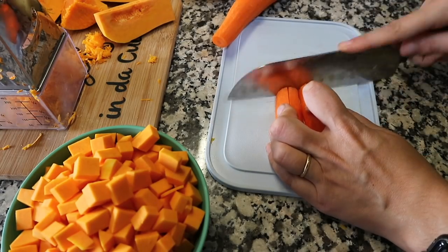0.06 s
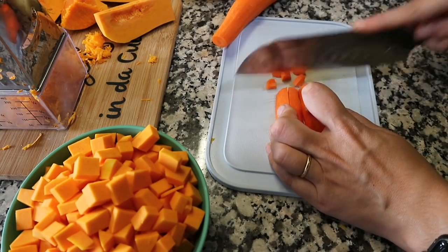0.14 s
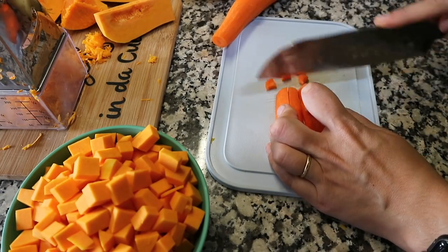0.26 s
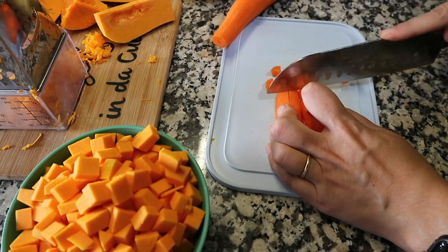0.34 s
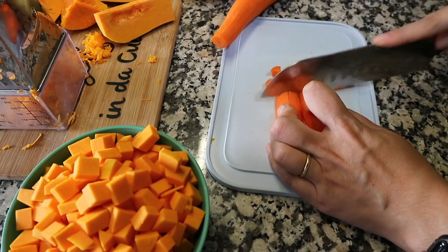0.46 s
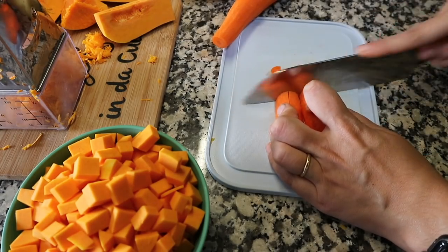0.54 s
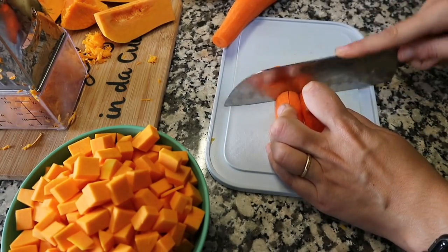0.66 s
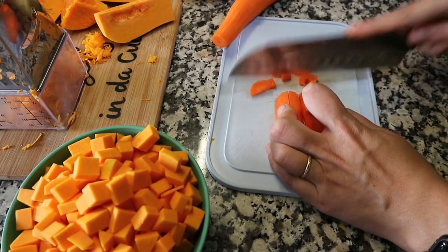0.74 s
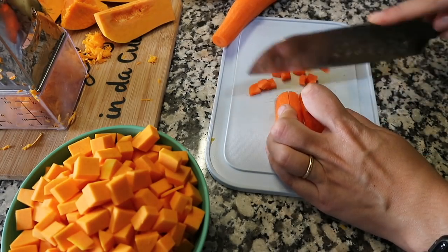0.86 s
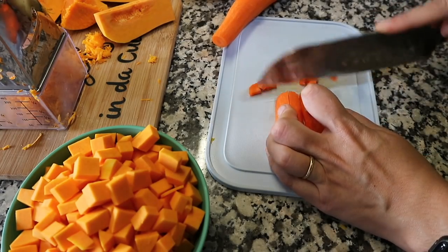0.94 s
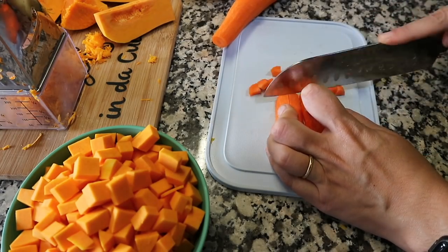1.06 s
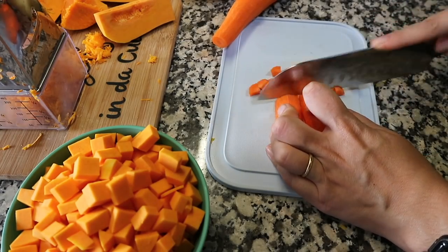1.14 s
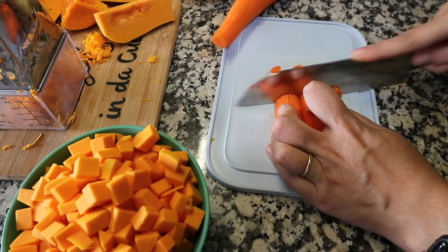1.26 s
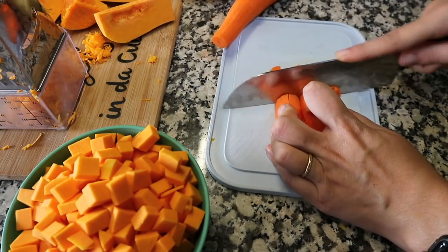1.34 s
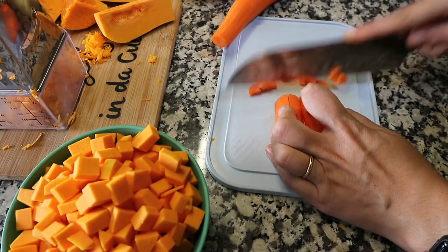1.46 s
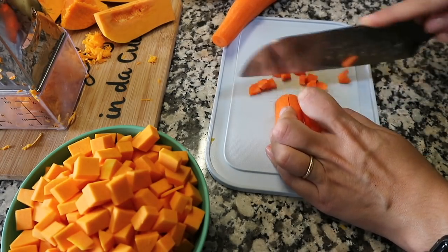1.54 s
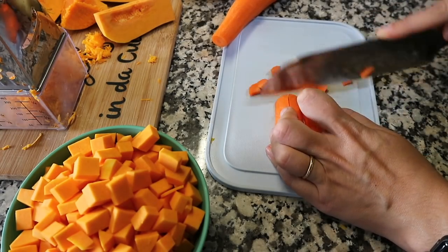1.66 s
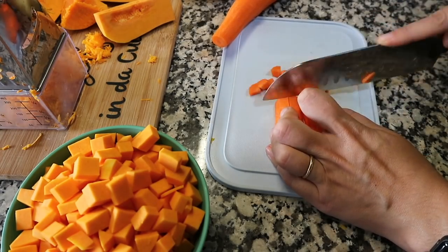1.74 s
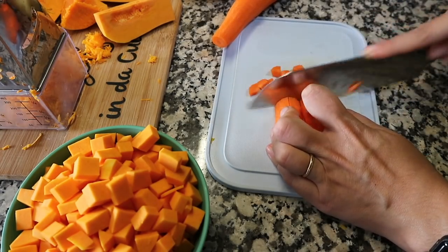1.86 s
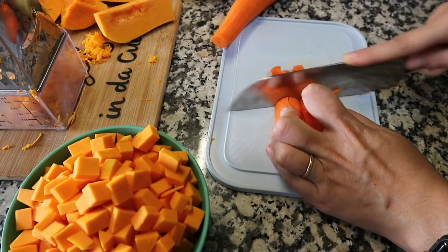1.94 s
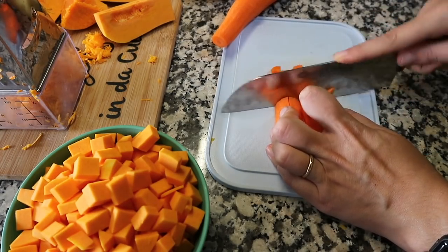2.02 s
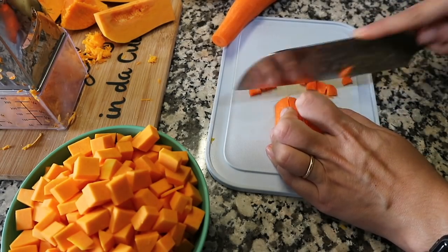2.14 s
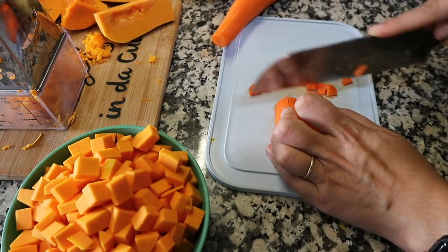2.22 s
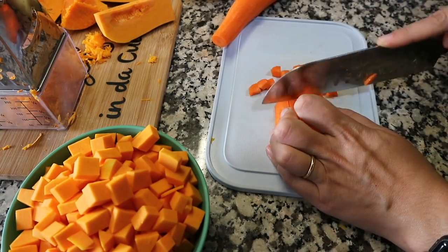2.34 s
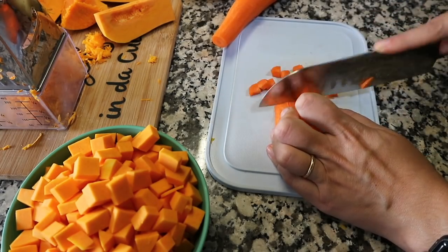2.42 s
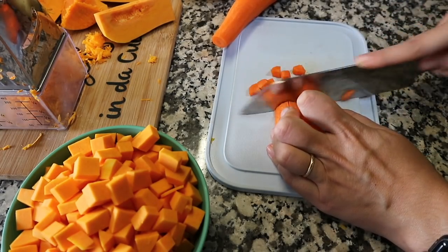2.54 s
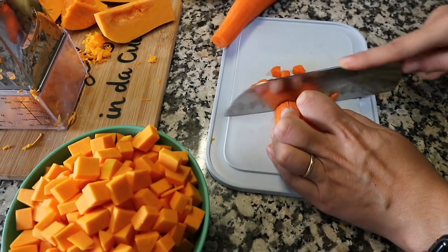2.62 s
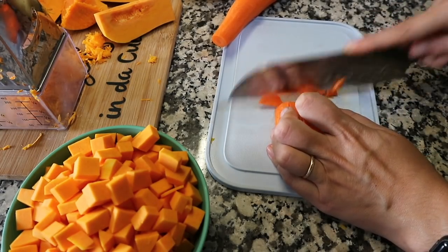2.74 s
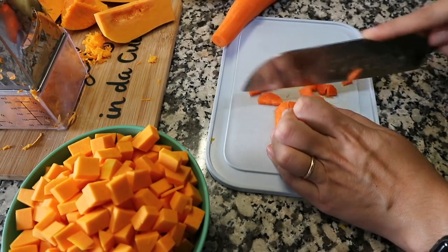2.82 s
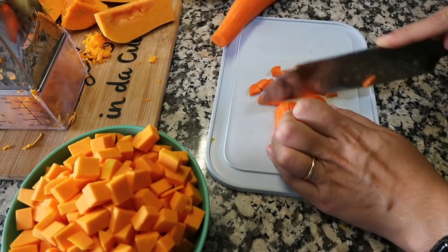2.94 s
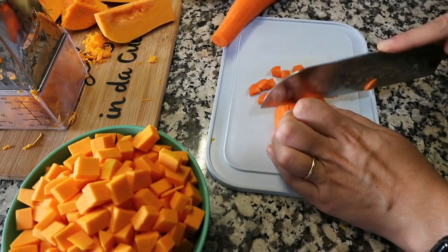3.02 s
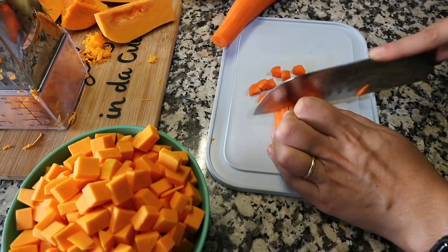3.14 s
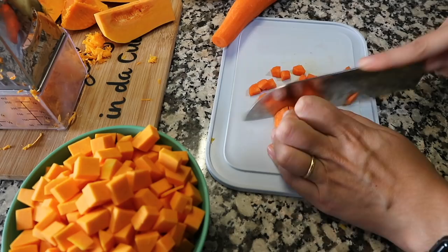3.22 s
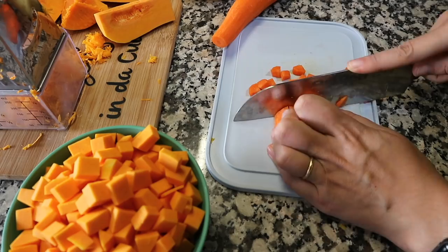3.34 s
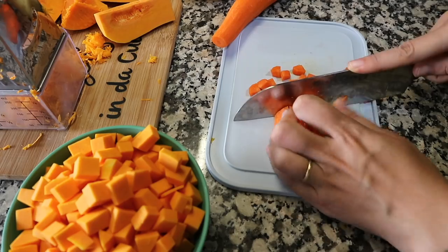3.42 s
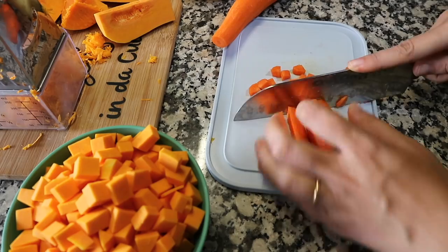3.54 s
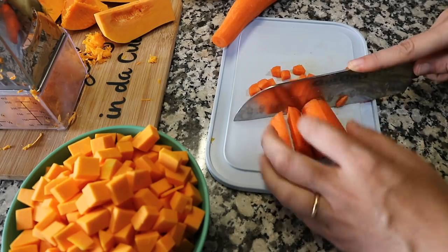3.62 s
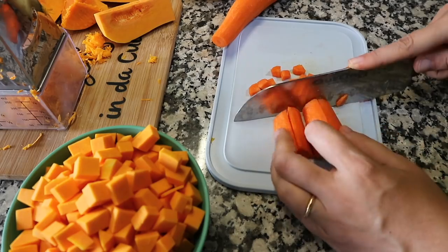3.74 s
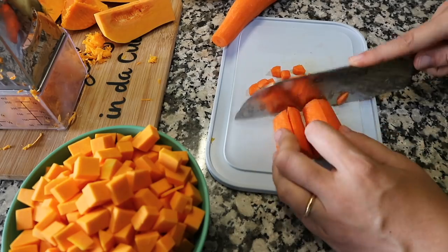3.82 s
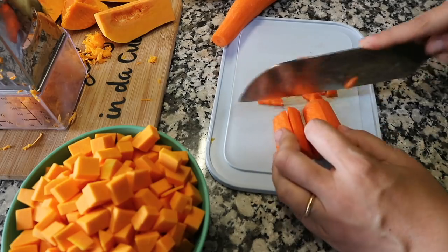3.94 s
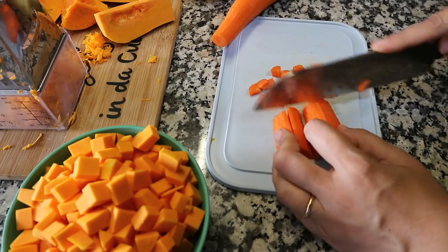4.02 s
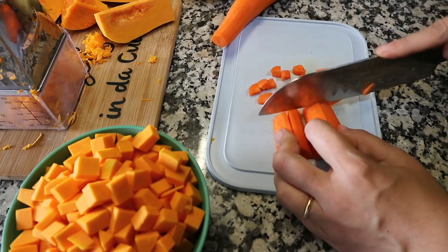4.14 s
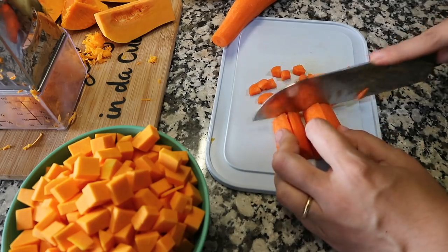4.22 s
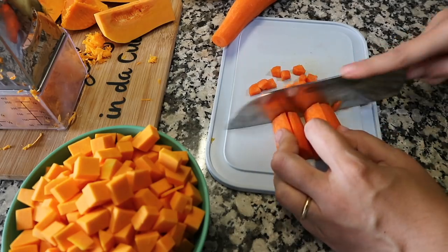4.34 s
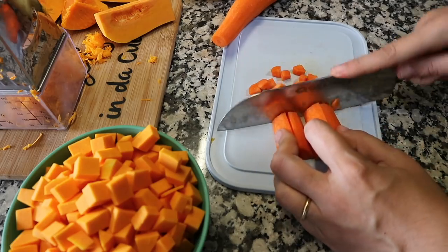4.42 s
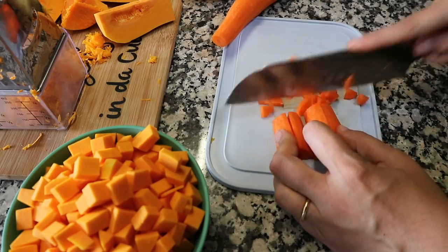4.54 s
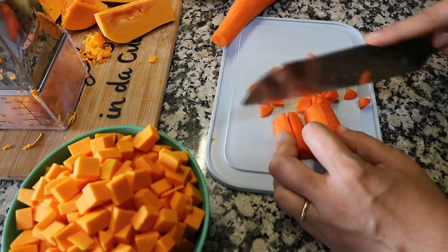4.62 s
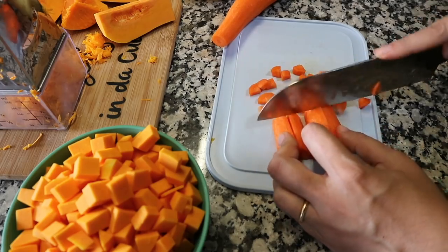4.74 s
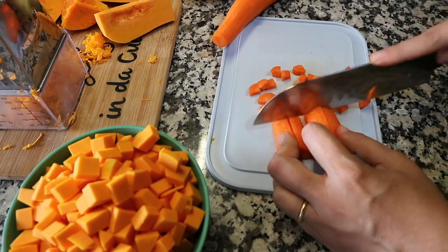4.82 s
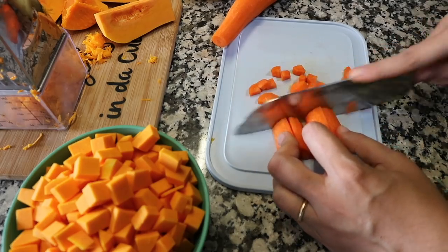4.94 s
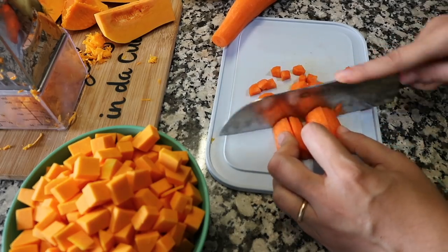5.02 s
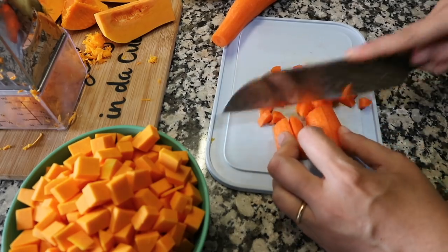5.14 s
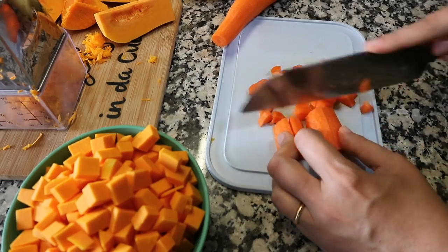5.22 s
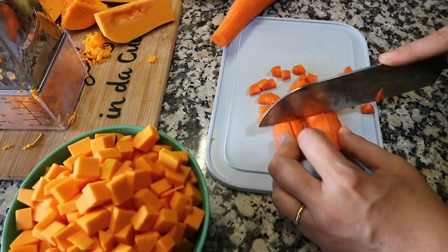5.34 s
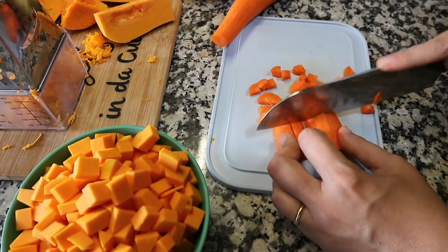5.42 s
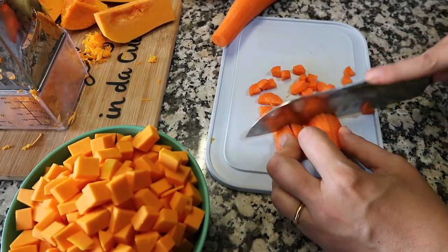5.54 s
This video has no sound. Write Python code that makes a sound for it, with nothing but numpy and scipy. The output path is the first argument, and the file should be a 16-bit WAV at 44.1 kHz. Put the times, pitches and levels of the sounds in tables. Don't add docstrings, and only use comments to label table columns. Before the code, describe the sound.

Close stereo sound of a kitchen knife chopping carrot on a small plastic board on a stone counter. It opens on the fading ring of an earlier knock. Each stroke has a light rustle as the edge meets skin, a thin hiss and crisp crack through the flesh, then an abrupt hard knock with a short hollow board ring, little bass. Knocks land near 0.56 (loud, bright), 1.3 (duller), 1.9 (soft, bright), 2.6 (loud), 3.3 (dull, ringing), 4.3 (soft, after a longer gap) and 5.0 seconds (loud, with a flurry of cracks before it). The blade hisses out, steel faintly ringing, and pieces tap dully, notably around 0.45, 1.05, a pair at 2.8, and 4.4. A last stroke is crunching at 5.5 when the sound stops. Throughout, an unsteady low appliance hum throbs around 120 hertz under soft room noise and a barely audible high whine; room reverberation is short.

```python
import sys
import numpy as np
from scipy import signal
from scipy.fft import rfft, irfft, next_fast_len
from scipy.io import wavfile

SR = 44100
rng = np.random.default_rng(int(sys.argv[2]) if len(sys.argv) > 2 else 0)


def file_out(sig):
    cols = np.atleast_2d(sig).T
    lim = np.clip(cols, -1, 1)
    pcm = np.round(lim * 32767).astype(np.int16)
    wavfile.write(sys.argv[1], SR, pcm)


def undo_db(level):
    steps = np.asarray(level, float) / 20
    return 10 ** steps


N = 245718
LEAD = 4410
SIZE = next_fast_len(N + 5 * LEAD)
HZ = np.maximum(np.arange(SIZE // 2 + 1) * SR / SIZE, 1.)

# time in s, peak in dB, bass tilt in dB/octave, treble tilt in dB/octave, ring in dB.
KNOCKS = [
    (0.5621, 5, -0.5, 3.5, -10),
    (1.3048, -2.5, 7.5, -3.5, -17.5),
    (1.9247, -15.5, 11, 7, -8),
    (2.58, 1.5, 1, 1.4, -10),
    (3.2745, -5, 2.2, -9.5, -6.5),
    (4.3285, -9, 0, -3, -5.5),
    (4.9743, 0.4, -1, -2.5, -10.5),
]
EARLIER_KNOCK = [(-0.076, -1, 6.9, 0.1, -1.5)]
BENDING_SWEEP_MS = [1.64, 3.1, 1.237, 3.9, 2.0, 1.7, 2.04, 1.524]
# frequency in Hz, density in dB per Hz.
KNOCK_SPECTRUM = [(180, -44), (300, -8), (500, 0.5), (1050, -1.1), (2290, 1.5), (3750, -6.5), (4920, -21),
                  (7350, -16), (9000, -21), (15500, -37.5)]
# frequency in Hz, width in Hz, level in dB.
CLACK_PEAKS = [(1220, 130, 11.5), (2320, 460, 3), (3470, 510, -8)]
# frequency in Hz, level in dB, T60 in s.
BOARD_MODES = [(336, -15, 0.089), (432, -5, 0.072), (519, -5.5, 0.058), (634, -13.5, 0.066),
               (714, -7.5, 0.081), (994, -8.5, 0.047), (1260, -6, 0.093), (1460, -8, .07),
               (1670, -2.5, 0.16), (2118, -7, 0.059), (2600, -4, 0.042), (2810, -6, 0.051),
               (2994, -11, 0.11), (3510, -13.5, 0.094)]

# bite time in s, then hiss in dB at bite, pressed, breaking, sliding out.
STROKES = [
    (-0.2, -55, -45, -33, -33),
    (0.454, -52.5, -42, -24.5, -37),
    (1.135, -52, -44, -35, -43),
    (1.817, -53, -43, -31.5, -38.5),
    (2.42, -58.5, -41.5, -29.5, -40.5),
    (3.09, -54.5, -41, -26.5, -36),
    (4.19, -53, -46.5, -31.5, -32.5),
    (4.821, -50.5, -41, -26.5, -36.5),
    (5.44, -54, -43, -32, -27.5),
]
# board rub in dB, blade over hiss in dB, after the knock rub over hiss in dB
# and blade over hiss in dB, breaking time in s.
STROKE_CONTACT = [(-40, 0, 13, -2, .04), (-38, 2.5, 21, 15, 0.023), (-40, 3.5, 16.5, 3, 0.042),
                  (-38.5, 5.5, 3.5, 0.5, 0.039), (-41, 3, 16.5, 11.5, 0.038), (-43.5, 1, 8, 2.5, 0.032),
                  (-44, -1, 1.5, -5, 0.074), (-49.5, -1, 11, 4.5, 0.061), (-50, -3.5, 0, 0, 0.074)]
# frequency in Hz, density in dB per Hz.
HISS_SPECTRUM = [(1470, -6), (2500, -28.5), (2990, -19), (3600, -8), (4680, -11), (7100, -12), (7850, -12),
                 (13800, -18.5), (15900, -27)]
# frequency in Hz, width in Hz, level in dB.
RUB_PEAKS = [(710, 560, -1), (1250, 620, -8.5), (1460, 52, 7), (1735, 280, 1.5), (1774, 620, -2)]
# frequency in Hz, width in Hz, level in dB.
BLADE_PEAKS = [(2280, 550, -2), (2580, 127, 2.5), (2813, 130, -2), (3040, 520, -6), (3540, 370, -6),
               (4170, 150, -12), (4700, 500, -20)]
# frequency in Hz, width in Hz, level in dB.
SHEEN_PEAKS = [(3940, 96, 0), (4400, 100, 0), (5030, 68, -5.5), (5440, 87, -4), (6220, 270, -3.5),
               (7030, 110, -9), (7270, 160, -10), (9500, 120, -19)]
# frequency in Hz, side minus mid in dB.
CUT_SIDE = [(60, -43), (110, -20), (200, -30), (380, -20), (700, -35), (1290, -46), (2380, -30),
            (4400, -9.5), (8120, -0.5), (15000, 3)]

# time in s, peak in dB, ringing in Hz, length in ms.
TOUCHES = [(0.3506, -65, 3460, 16), (0.3686, -35.5, 3916, 7.6), (1.0437, -38.5, 6070, 10.7),
           (1.7331, -36.5, 3960, 11.0), (2.348, -43, 3920, 9.3), (2.4029, -46, 3660, 8.7),
           (2.4369, -40, 3570, 11.0), (3.014, -42.5, 5630, 9.1), (3.0797, -44, 5440, 12.7),
           (3.4724, -51.5, 3944, 11.0), (3.7222, -49, 3770, 11.0), (4.094, -40.5, 3650, 9.9),
           (4.1873, -39.5, 3720, 10.8), (4.7543, -36.5, 5030, 9.6), (4.8165, -50, 3602, 6.5),
           (5.3624, -35.5, 6380, 6.6), (5.4346, -31, 3605, 10.5)]
# time in s, peak in dB, ringing in Hz, length in ms.
CRACKS = [(0.5302, -20.5, 2450, 1.6), (1.2754, -35, 2750, 3.2), (1.9044, -23, 2495, 2.5),
          (2.5494, -30, 2510, 3.04), (3.2146, -31, 2848, 2.5), (3.2405, -22, 2400, 1.4),
          (3.2665, -12, 2364, 2.5), (4.291, -32, 2820, 1.8), (4.8988, -23, 3430, 2.5),
          (4.9114, -22, 4470, 2.8), (4.9314, -28, 5102, 2.37), (4.9397, -18.5, 4190, 3.6),
          (4.9464, -17, 3930, 2.5), (4.9552, -18, 2301, 2.56), (5.5353, -16.5, 2380, 2.7),
          (5.5464, -18, 2320, 2.5), (5.5574, -18, 3420, 1.8)]
# time in s, peak in dB, ringing in Hz, length in ms.
TAPS = [
    (0.447, -29.5, 1665, 8.0),
    (1.049, -30, 1540, 4.2),
    (2.409, -39, 1730, 6.3),
    (2.8205, -32, 1450, 5.2),
    (2.839, -33, 2285, 3.5),
    (4.095, -30.5, 1370, 5.6),
    (4.2068, -42, 1680, 5.2),
    (4.4445, -28.5, 1460, 4.5),
]

# frequency in Hz, T60 in s.
ROOM_T60 = [(200, 0.36), (600, 0.29), (1700, 0.2), (4000, 0.21), (9000, 0.1)]
# centre in s, level in dB, pitch in Hz, half width in s.
SURGES = [(.07, -36, 121.4, 0.053), (.27, -35, 122.5, 0.069), (.55, -33.5, 123.3, 0.18),
          (0.878, -26, 126, .08), (1.07, -32.5, 125.9, 0.033), (1.29, -29, 129.4, 0.048),
          (1.42, -26, 126.1, 0.031), (1.66, -39, 125.7, .1), (1.85, -37, 116.7, 0.084),
          (2.05, -37, 130.9, 0.019), (2.25, -31.5, 124, 0.055), (2.55, -33.5, 112.9, 0.11),
          (2.88, -32.5, 116.2, .09), (3.18, -34, 114.7, 0.063), (3.348, -39, 129.2, .02),
          (3.469, -38, 102.3, 0.027), (3.692, -34, 118, 0.047), (4.0, -39, 121.4, 0.048),
          (4.152, -34.5, 122, 0.025), (4.47, -33, 127, 0.025), (4.6, -36.5, 127, 0.042),
          (4.759, -30.5, 122, 0.019), (4.85, -43, 127.3, 0.021), (4.948, -33, 119.9, 0.019),
          (5.07, -31, 123, 0.037), (5.23, -35.5, 125, 0.032), (5.54, -39.5, 128, 0.054)]
# frequency in Hz, density in dB per Hz.
AIR_SPECTRUM = [(15, -68.5), (32, -28.5), (69, -15.5), (93, -7.5), (122, -2), (178, -14), (445, -22),
                (684, -20.5), (1380, -20.5), (1750, -26.5), (3500, -43), (7100, -59.5), (9300, -62),
                (11500, -69)]
# frequency in Hz, width in Hz, level in dB.
AIR_PEAKS = [(199.7, 9.7, -50), (238.2, 21, -52.5), (323, 21, -56), (812, 20.4, -53)]
# frequency in Hz, side minus mid in dB.
AIR_SIDE = [(60, -25.5), (110, -26), (200, -21.5), (380, -14), (700, -19), (1290, -17), (2380, -6.5),
            (4400, 0.5), (8120, 5), (15000, 6)]

NEXT_KNOCK_S = 5.6
HOLD_S, LET_GO_S = 0.0053, 0.0089
BITE_DB_PER_S, SLIDE_DB_PER_S, RUB_DB_PER_S = 502, 195, 192
BLADE_DAMPED_DB = 2
AFTER_TOUCH_DB, AFTER_TOUCH_S, TOUCH_DB_PER_S = -16, 0.0091, 380
RUB_LIMIT_DB = -24
WHINE_HZ, WHINE_DB = 15400, -81.
AIR_DB = -37.
GAIN_FROM_DB, GAIN_SHARE, GAIN_ATTACK_HZ, GAIN_RELEASE_DB_PER_S = -2.5, 1.0, 4, 12
CUTOFF_HZ = 16050


def rms_one(x):
    return x / np.sqrt(np.mean(x ** 2) + 1e-20)


def at_hz(points, hz):
    point_hz, db = np.transpose(points)
    return np.interp(np.log(hz), np.log(point_hz), db)


def drift(rate_hz):
    r = np.exp(-2 * np.pi * rate_hz / SR)
    return rms_one(signal.lfilter([1], [1, -2 * r, r * r], rng.standard_normal(N + SR))[SR:])


def resonances(peaks):
    return np.sqrt(sum(undo_db(db) ** 2 / (1 + (2 * (HZ - hz) / width_hz) ** 2) ** 2 for hz, width_hz, db in peaks))


def resonator(x, hz, width_hz):
    r = np.exp(-np.pi * width_hz / SR)
    return signal.lfilter([1, 0, -1], [1, -2 * r * np.cos(2 * np.pi * hz / SR), r * r], x)


def stereo(gain, side_points, source):
    width = [np.ones_like(HZ), undo_db(at_hz(side_points, HZ))]
    mid, side = irfft(rfft(source, SIZE) * gain * width, SIZE)[:, :N]
    return np.array([mid + side, mid - side]) / np.sqrt(np.mean(mid ** 2))


def knock_pulse(hz, size, sweep_ms, bass_db, treble_db, echo_db, echo_fall_db):
    octaves = np.log2(hz / 1600)
    tilt_db = bass_db * np.maximum(-octaves, 0) + treble_db * np.maximum(octaves, 0)
    colour = undo_db(at_hz(KNOCK_SPECTRUM, hz) + tilt_db)
    colour = colour * (1 + sum(undo_db(db) / (1 + 2j * (hz - top_hz) / width_hz) for top_hz, width_hz, db in CLACK_PEAKS))
    slow_hz = np.minimum(hz, 3000)
    bending = 2 * np.sqrt(3000 * slow_hz) - slow_hz
    phase = 2 * np.pi * (bending * sweep_ms / 1300 + .0004 * hz)
    lags_s = np.cumsum(rng.uniform(0.0022, 0.0055, 8))
    signs = rng.choice([-1, 1], 8)
    returns = 0
    for k, (lag_s, sign) in enumerate(zip(lags_s, signs)):
        delay = np.exp(-2j * np.pi * hz * lag_s - .3j * (k + 1) * phase)
        returns = returns + sign * undo_db(echo_db - echo_fall_db * k) * delay
    returns = returns / (1 + (hz / 4000) ** 4)
    direct = colour * np.exp(-1j * phase)
    return irfft(direct * (1 + returns), size) / np.abs(irfft(direct, size)).max()


def board_ring(t, ring_db, bass_db):
    ring = np.zeros(len(t))
    spread_db = rng.normal(0, 2.5, len(BOARD_MODES))
    splits = rng.uniform(.02, .05, len(BOARD_MODES))
    for (mode_hz, db, t60_s), own_db, split in zip(BOARD_MODES, spread_db, splits):
        late_s = np.maximum(t - 0.992 / mode_hz, 0)
        level_db = ring_db + db + own_db - 11.0 + 1.18 * bass_db * (mode_hz < 800)
        beating = 1 + 1.63 * np.sin(2 * np.pi * split * mode_hz * late_s)
        ring += undo_db(level_db - 60 * late_s / t60_s) * beating * np.sin(2 * np.pi * mode_hz * late_s)
    return ring


def knocks(echo_db, echo_fall_db):
    out, size = np.zeros(SIZE), 8192
    hz = np.maximum(np.arange(size // 2 + 1) * SR / size, 20.)
    t = np.arange(size) / SR
    for (s, peak_db, bass_db, treble_db, ring_db), sweep_ms in zip(EARLIER_KNOCK + KNOCKS, BENDING_SWEEP_MS):
        pulse = knock_pulse(hz, size, sweep_ms, bass_db, treble_db, echo_db, echo_fall_db)
        pulse = pulse + board_ring(t, ring_db, bass_db)
        at = LEAD + round(s * SR)
        out[at:at + size - 512] += undo_db(peak_db) * pulse[:-512]
    no_bass = signal.butter(2, 180, "high", fs=SR, output="sos")
    return signal.sosfilt(no_bass, out + 1e-18)


def pressure():
    t = np.arange(N) / SR
    levels = np.full((3, N), -120.)
    landings_s = [row[0] for row in EARLIER_KNOCK + KNOCKS] + [NEXT_KNOCK_S]
    for land, stroke, contact in zip(landings_s, STROKES, STROKE_CONTACT):
        bite, bite_db, press_db, break_db, out_db = stroke
        rub_db, blade_db, rub_out_db, blade_out_db, break_s = contact
        times = [bite - 1, bite, land - break_s, land - HOLD_S, land, land + LET_GO_S, land + LET_GO_S + 1]
        held_db = blade_db - BLADE_DAMPED_DB
        hiss = np.array([bite_db - BITE_DB_PER_S, bite_db, press_db, break_db, break_db, out_db,
                         out_db - SLIDE_DB_PER_S])
        rub_end_db = out_db + rub_out_db
        rub = [rub_db - BITE_DB_PER_S, rub_db, rub_db, rub_db, rub_db, rub_end_db, rub_end_db - RUB_DB_PER_S]
        blade = hiss + [blade_db, blade_db, blade_db, held_db, held_db, blade_out_db, blade_out_db]
        levels = np.maximum(levels, [np.interp(t, times, db) for db in (hiss, rub, blade)])
    for s, peak_db, *_ in TOUCHES:
        start = s + AFTER_TOUCH_S
        slope = np.where(t > start, TOUCH_DB_PER_S, 10 * TOUCH_DB_PER_S)
        levels = np.maximum(levels, peak_db + AFTER_TOUCH_DB - slope * np.abs(t - start))
    return levels


def steel(x, ring_db):
    return irfft(rfft(x, SIZE) * (1 + undo_db(ring_db) * resonances(SHEEN_PEAKS)), SIZE)[:, :N]


def cut(grain_db, flutter_db, crackle_db, clump_db):
    hiss_db, rub_db, blade_db = pressure()
    snap_size = np.minimum(rng.exponential(size=(2, N)), 2)
    snaps = (rng.random((2, N)) < 900 / SR) * undo_db(crackle_db + 2.2 * snap_size)
    tearing = undo_db(grain_db * drift(300) + flutter_db * drift(32.0))
    grains = rng.standard_normal((2, N)) * (tearing + snaps * undo_db(clump_db * drift(25)))
    hiss = steel(stereo(undo_db(at_hz(HISS_SPECTRUM, HZ)), CUT_SIDE, grains), ring_db=0.5)
    top = signal.sosfiltfilt(signal.butter(2, 9000, "high", fs=SR, output="sos"), hiss)
    bright = undo_db(np.clip(0.36 * (hiss_db + 47), -20, 2.5))
    hiss = undo_db(hiss_db) * (hiss + (bright - 1) * top)
    rub = undo_db(np.minimum(rub_db, RUB_LIMIT_DB)) * stereo(resonances(RUB_PEAKS), CUT_SIDE, grains[::-1])
    blade = undo_db(np.minimum(blade_db, RUB_LIMIT_DB)) * stereo(resonances(BLADE_PEAKS), CUT_SIDE, grains[::-1])
    return hiss + rub + blade


def bursts(rows, low_hz, high_hz, ring, width_share, side_db, rise_ms):
    size = 4096
    out, ms = np.zeros((2, N + size)), np.arange(size) / SR * 1000
    band = signal.butter(3, [low_hz, high_hz], "band", fs=SR, output="sos")
    for s, peak_db, hz, length_ms in rows:
        rise = np.sin(np.pi / 2 * np.minimum(ms / rise_ms, 1)) ** 2
        mid, side = rng.standard_normal((2, size)) * rise * np.exp(-(ms / length_ms) ** 2)
        rung = resonator(mid, hz, width_share * hz)
        mid = rms_one(signal.sosfilt(band, mid)) + ring * rms_one(signal.sosfilt(band, rung))
        side = undo_db(side_db) * rms_one(signal.sosfilt(band, side))
        at = round(s * SR)
        out[:, at:at + size] += undo_db(peak_db) * np.array([mid + side, mid - side]) / np.abs(mid).max()
    return out[:, :N]


def touches():
    puffs = bursts(TOUCHES, 2000, 12000, ring=.3, width_share=.04, side_db=-3., rise_ms=2.5)
    return undo_db(1.5) * steel(signal.lfilter([.5], [1, -.5], puffs), ring_db=3.0)


def cracks():
    return bursts(CRACKS, 1400, 8300, ring=0.63, width_share=0.055, side_db=-8.0, rise_ms=1.24)


def taps():
    return bursts(TAPS, 1200, 2700, ring=1.0, width_share=0.065, side_db=-24.5, rise_ms=3.)


def room(dry, wet_db):
    wet = np.zeros((2, len(HZ)), complex)
    for k, lag_s in enumerate(rng.uniform(.006, 0.026, 20)):
        loop = undo_db(-60 * lag_s / at_hz(ROOM_T60, HZ)) * np.exp(-2j * np.pi * HZ * lag_s)
        wet[k % 2] += (-1) ** (k // 2) * loop / (1 - loop)
    side = undo_db(at_hz(AIR_SIDE, HZ)) * wet[1]
    pair = np.array([wet[0] + side, wet[0] - side])
    return undo_db(wet_db) * irfft(pair * rfft(dry, SIZE), SIZE)[:, LEAD:LEAD + N]


def drone(wobble_hz):
    t = np.arange(N) / SR
    strength = sum(undo_db(db) * np.exp(-((t - s) / half_s) ** 2 / 2) for s, db, _, half_s in SURGES)
    surge_s, _, surge_hz, _ = np.transpose(SURGES)
    hz = np.interp(t, surge_s, surge_hz) + wobble_hz * drift(7.95)
    return strength * np.sqrt(2) * np.sin(2 * np.pi * np.cumsum(hz) / SR)


def air(level_db):
    uneven = rng.standard_normal((2, N)) * undo_db(0.85 * drift(21))
    broad = stereo(undo_db(at_hz(AIR_SPECTRUM, HZ)), AIR_SIDE, uneven)
    peaks = stereo(resonances(AIR_PEAKS), AIR_SIDE, rng.standard_normal((2, N)))
    return undo_db(level_db) * (broad + undo_db(-9.5) * peaks)


def whine():
    phase = 2 * np.pi * WHINE_HZ * np.arange(N) / SR + np.array([[0], [1.2]])
    return undo_db(WHINE_DB - 3.0 + 1.5 * drift(30)) * np.sin(phase)


def scene():
    board = knocks(echo_db=-15.0, echo_fall_db=3.0)
    late = (board + np.roll(board, shift=1)) / 2
    near = np.array([board, late])[:, LEAD:LEAD + N] * undo_db([[-.5], [.5]])
    small = touches() + cracks() + taps()
    knife = small + cut(grain_db=1.0, flutter_db=1.0, crackle_db=3.5, clump_db=3.5)
    knife = knife * undo_db([[-.4], [.4]])
    heard_by_walls = board[:LEAD + N] + 0.73 * np.pad(small.mean(axis=0), (LEAD, 0))
    kitchen = room(heard_by_walls, wet_db=-20.0) + drone(wobble_hz=2.42) + air(AIR_DB) + whine()
    return near + knife + kitchen


def gain_control(dry):
    over_db = np.maximum(20 * np.log10(np.abs(dry).max(axis=0) + 1e-9) - GAIN_FROM_DB, 0)
    ramp_db = GAIN_RELEASE_DB_PER_S * np.arange(N) / SR
    held_db = np.maximum.accumulate(GAIN_SHARE * over_db + ramp_db) - ramp_db
    r = np.exp(-2 * np.pi * GAIN_ATTACK_HZ / SR)
    return dry * undo_db(-signal.lfilter([1 - r], [1, -r], held_db))


def top_cut(x):
    return signal.sosfilt(signal.butter(12, 16020, fs=SR, output="sos"), x)


def record(dry):
    ducked = gain_control(dry)
    held = ducked / (1 + np.abs(ducked) ** 6) ** (1 / 6)
    low_pass = signal.ellip(10, .3, 50, CUTOFF_HZ - 150, fs=SR, output="sos")
    mix = signal.sosfilt(low_pass, held)
    return top_cut(mix)


dry = scene()
out = record(dry)
file_out(out)
```